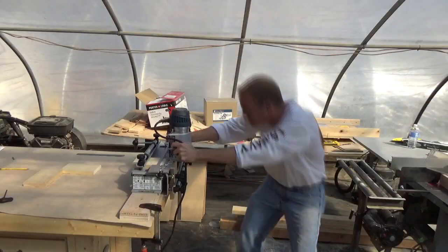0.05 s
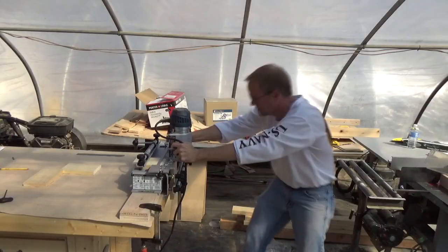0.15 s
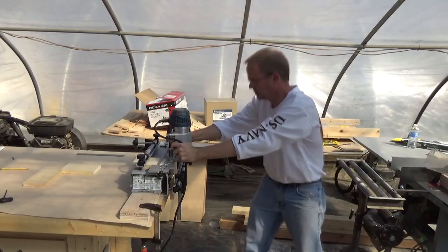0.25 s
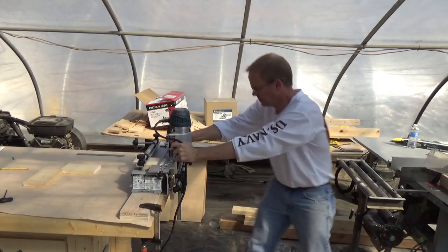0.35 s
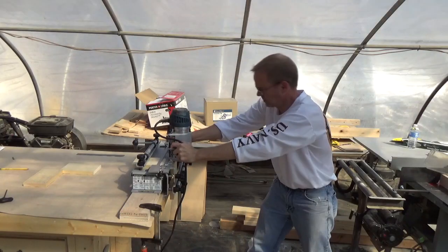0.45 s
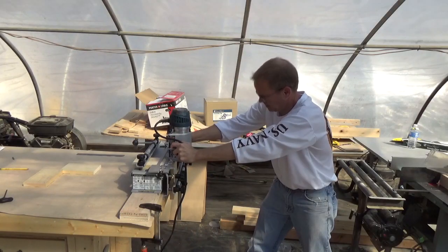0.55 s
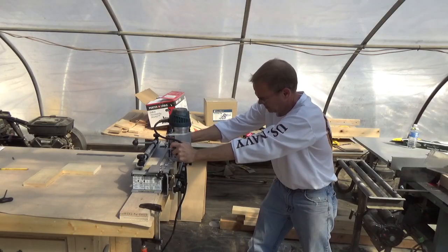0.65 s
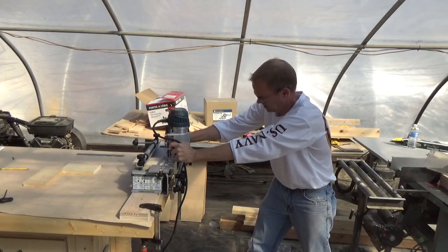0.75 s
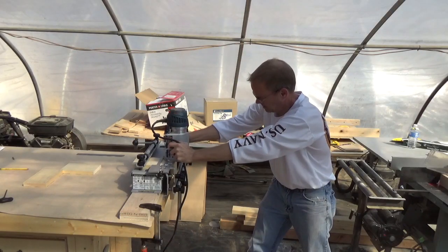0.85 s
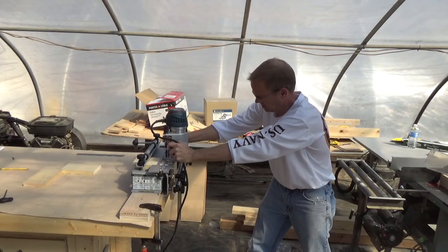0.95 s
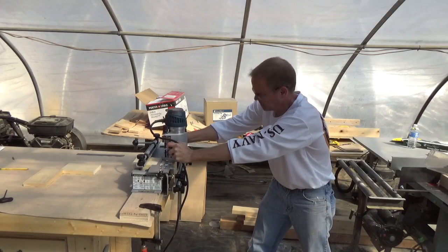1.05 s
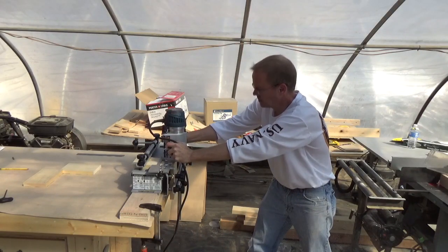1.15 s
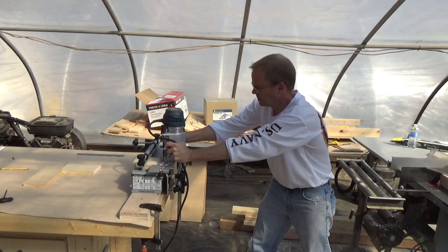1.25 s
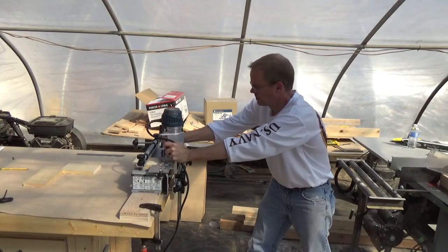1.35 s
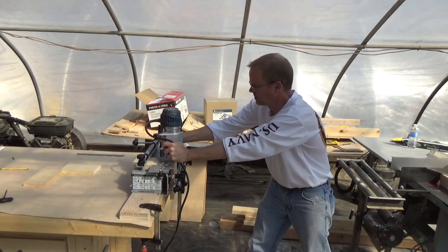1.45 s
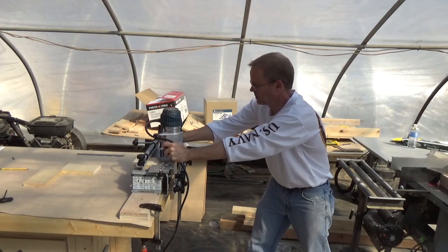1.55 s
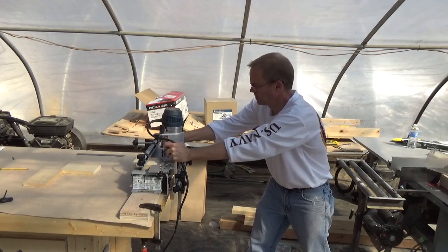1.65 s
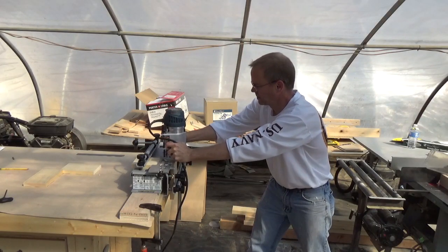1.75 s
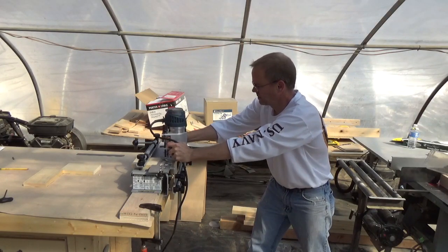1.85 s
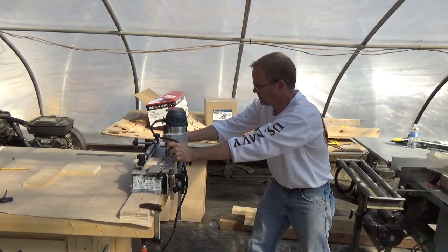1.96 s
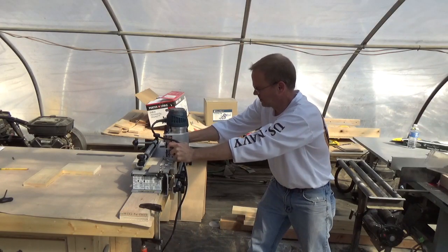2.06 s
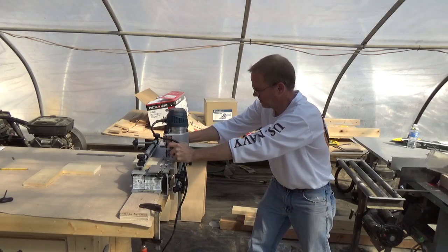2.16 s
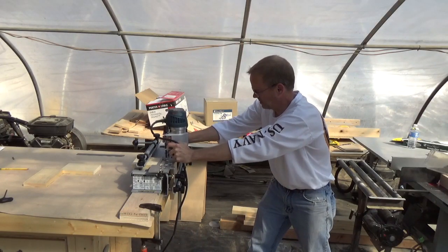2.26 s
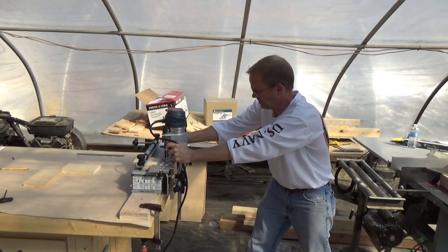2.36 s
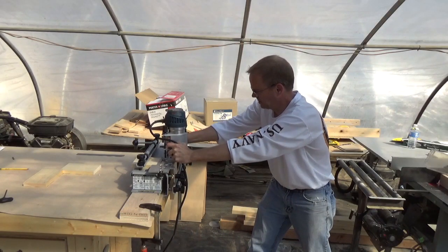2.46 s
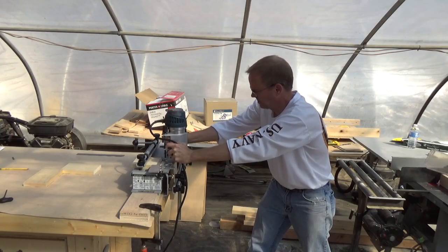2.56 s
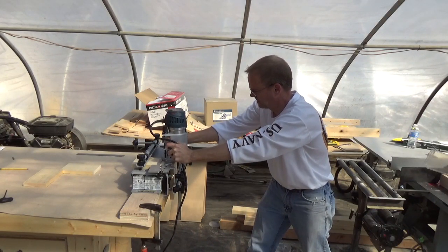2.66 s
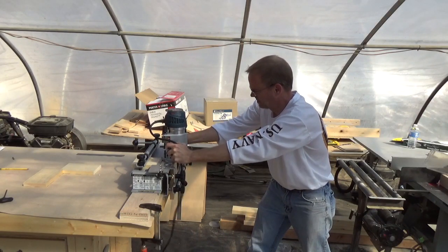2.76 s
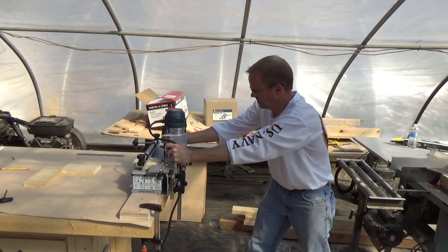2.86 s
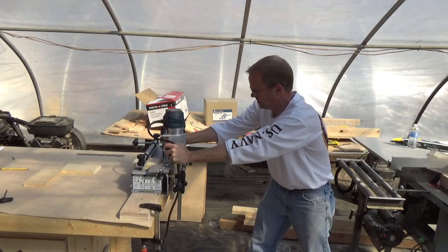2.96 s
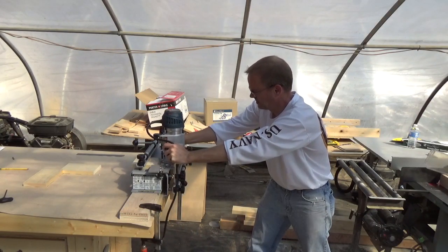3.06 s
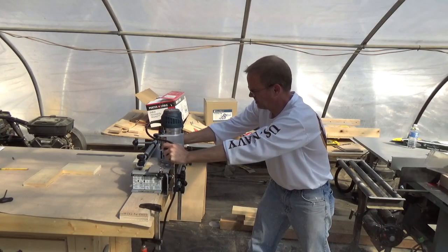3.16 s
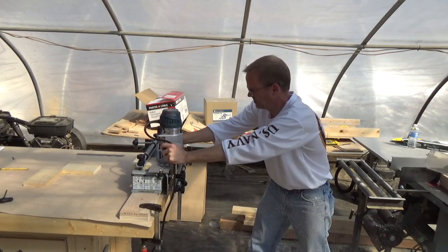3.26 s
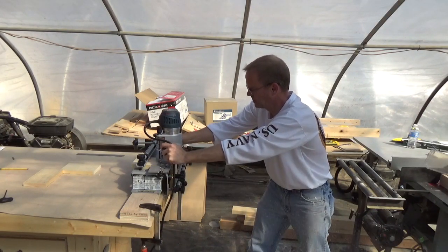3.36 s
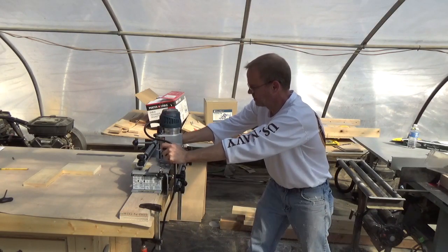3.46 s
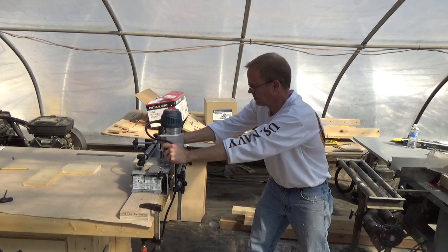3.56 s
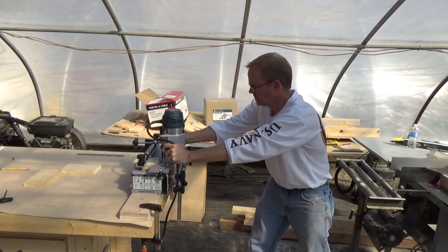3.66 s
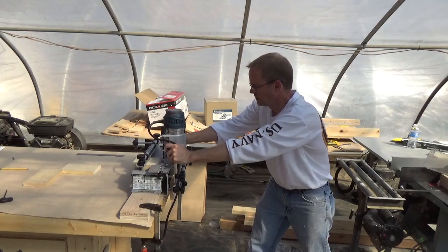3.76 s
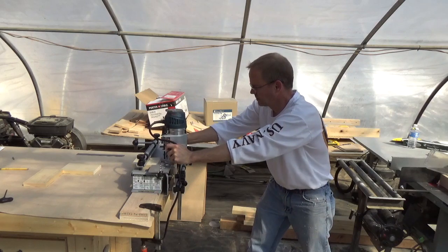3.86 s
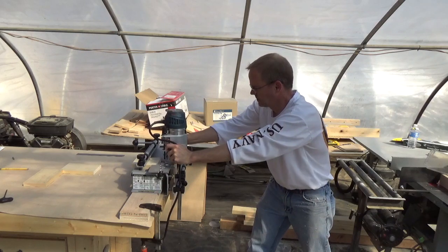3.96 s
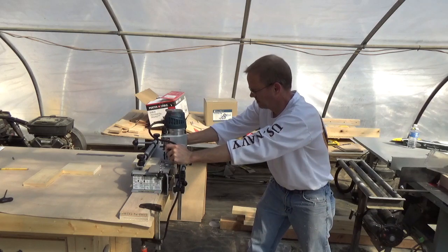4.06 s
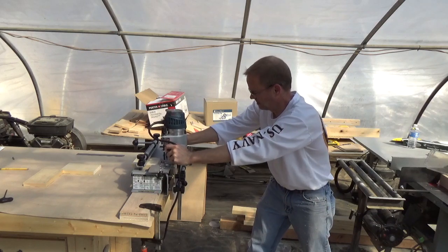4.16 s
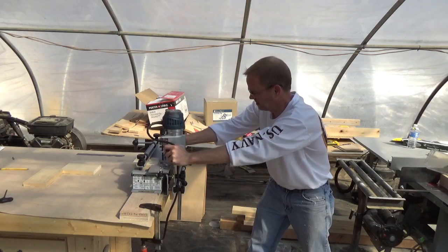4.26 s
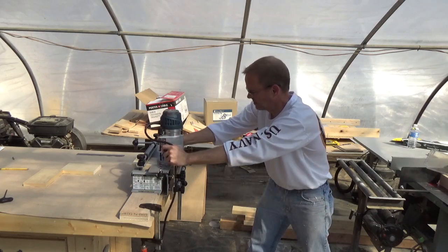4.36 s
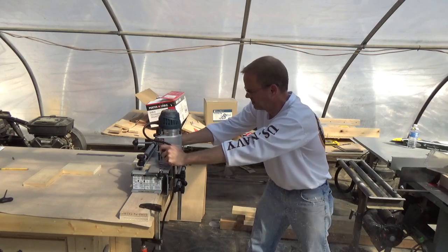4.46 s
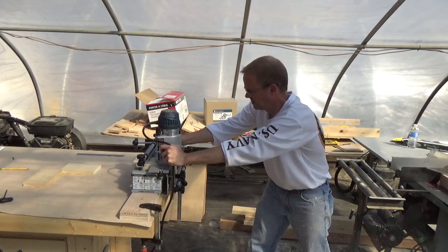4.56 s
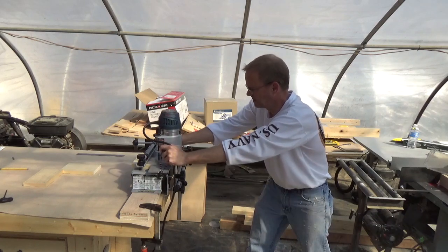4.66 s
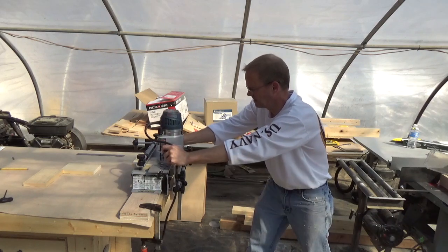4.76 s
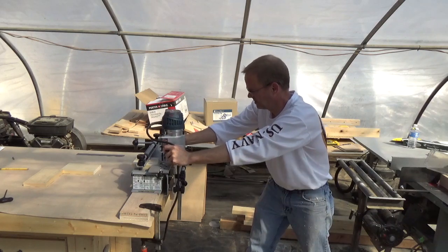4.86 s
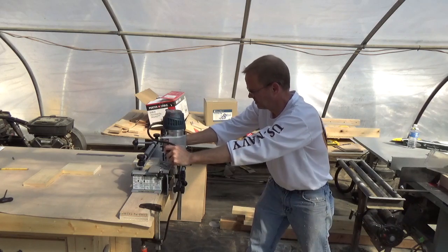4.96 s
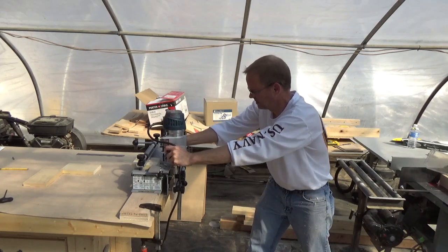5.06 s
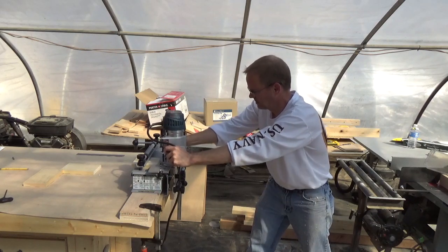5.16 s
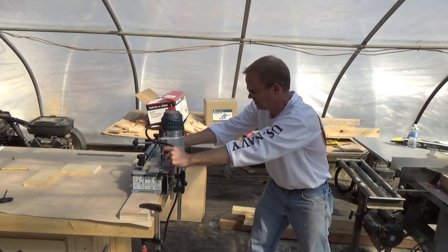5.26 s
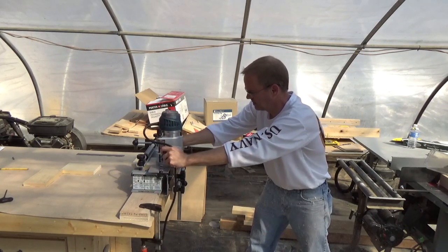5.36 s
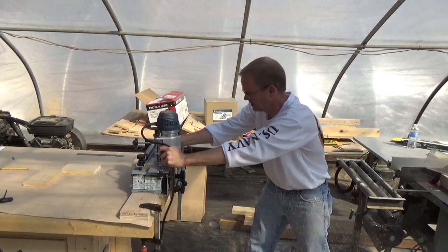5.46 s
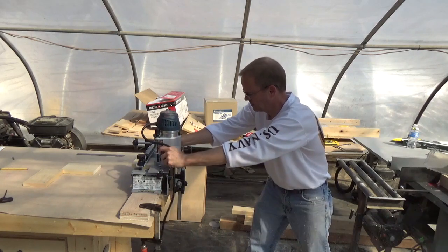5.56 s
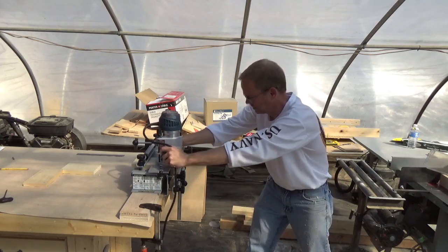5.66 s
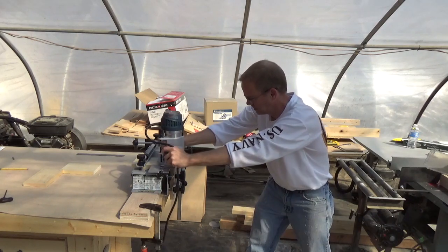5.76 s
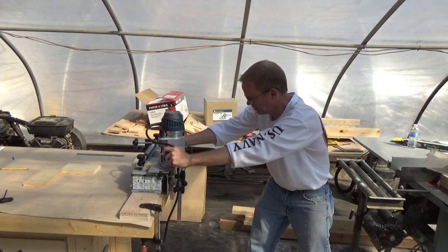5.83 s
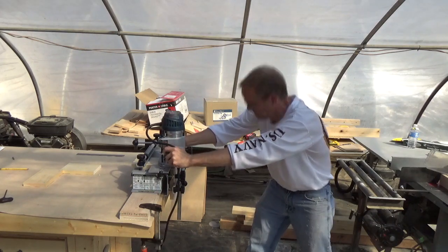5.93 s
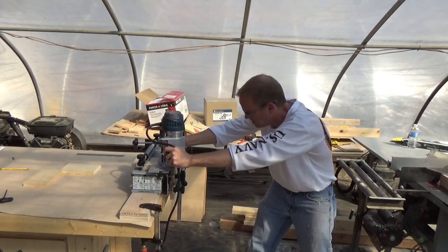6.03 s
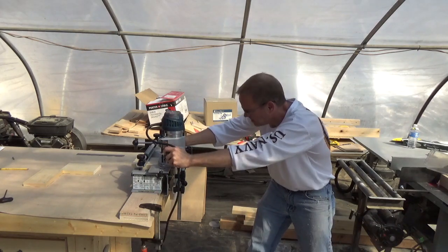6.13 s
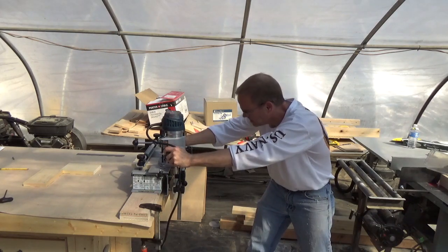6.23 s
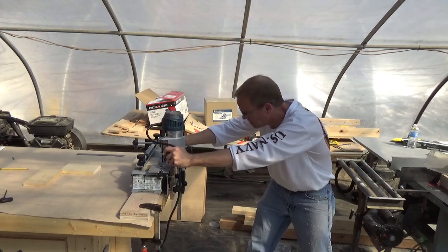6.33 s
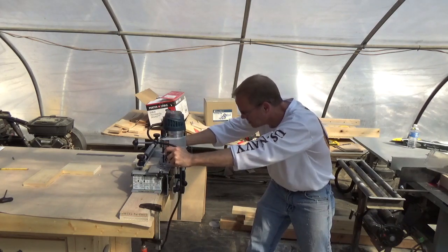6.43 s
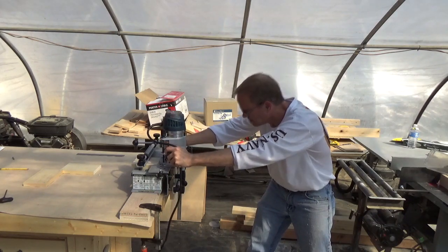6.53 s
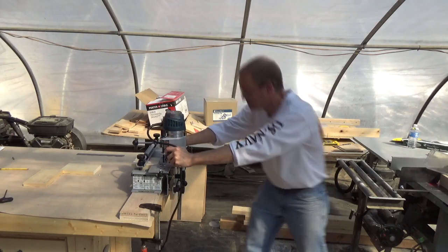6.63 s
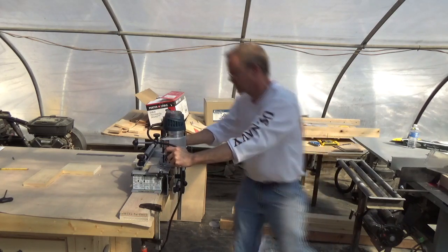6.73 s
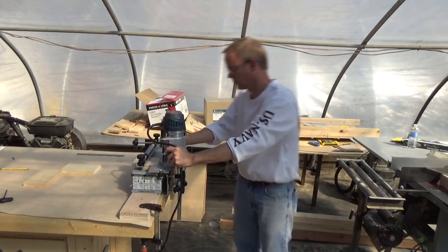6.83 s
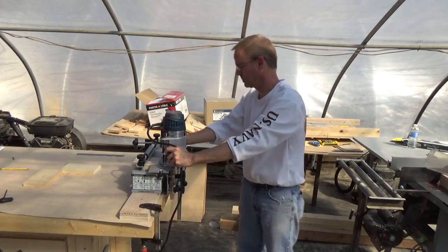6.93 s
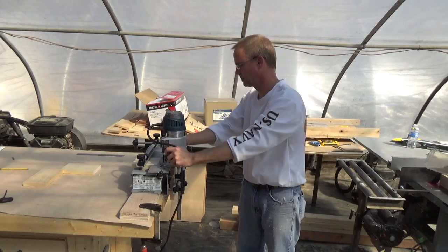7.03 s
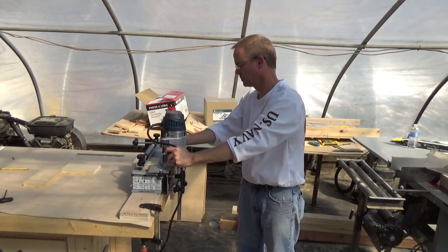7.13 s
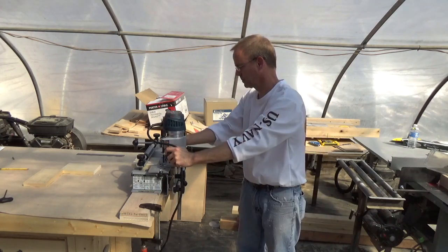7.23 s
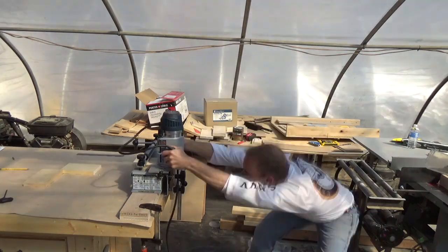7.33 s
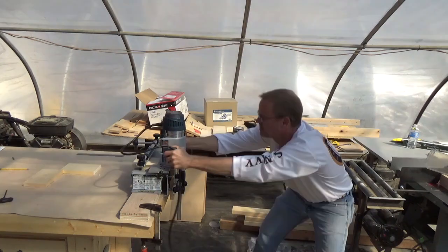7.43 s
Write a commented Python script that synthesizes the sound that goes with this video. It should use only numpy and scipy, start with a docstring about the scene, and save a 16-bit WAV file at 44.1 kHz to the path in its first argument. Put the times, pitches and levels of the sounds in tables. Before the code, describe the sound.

Close stereo microphone in a workshop with plastic film walls. For the first 0.3 seconds there is only low background rumble and faint rustling. At about 0.34 a handheld router is switched on: its pitch shoots up with a short rough squeal near 0.45 and fan air swelling, reaching full speed by about 0.9. A steady hum near 425 hertz carries a bright, flickering stack of whining overtones, prominent around 2 kilohertz, over roaring, hissing cooling air. Light cuts into boards sag the pitch slightly at about 1.3, 3.4, 4.55 and 5.5, the last three deeper; the whine turns harder and the air thins, then speed recovers quickly. At 6.2 the switch opens: the whine stops at once, thin whistles linger briefly, and a hollow, breathy whir slides down with an uneven hum. At 7.4 sound breaks off for a few milliseconds, then airy noise swells back until the end.

```python
"""Handheld router, four light cuts

Close stereo microphone in a film-walled workshop: the router is switched on, cuts clamped boards and coasts down.
The shaft's rotation sounds as a stack of sine multiples that sag with the load. The cooling air, shaped noise,
roars and hisses through the housing. At the end the sound breaks off, and the air fades in again."""
import sys
import numpy as np
from scipy import signal
from scipy.fft import rfft, irfft, next_fast_len
from scipy.io import wavfile
from scipy.ndimage import uniform_filter1d

SR = 44100
rng = np.random.default_rng(int(sys.argv[2]) if len(sys.argv) > 2 else 0)


def int16_out(signal):
    """Quantize to a 16-bit WAV file."""
    q = np.round(np.clip(np.atleast_2d(signal).T, -1, 1) * 32767)
    wavfile.write(sys.argv[1], SR, q.astype(np.int16))


def attenuation_scalar(level_db):
    """Turn a level in dB into a linear amplitude multiplier (20 dB per decade)."""
    decades = np.asarray(level_db, float) / 20
    return 10 ** decades


N = 330309   # length in samples

ON_S, OFF_S, AT_SPEED_S = .34, 6.2, .7
BREAK_S = 7.399, 7.406   # start and end of the near-silent gap

# shaft speed through run-up, four cuts, coasting and the fade back in: [t/s, turns per second/Hz]
SPEED = [(.29, 45), (.34, 78), (.42, 123.6), (.46, 190), (.52, 290.7), (.58, 358.4), (.66, 392), (.77, 413),
         (.92, 425.4), (1.0, 425.5), (1.32, 412), (1.44, 422), (1.54, 430), (1.66, 424.5), (1.8, 426.5),
         (2.4, 424.5), (2.48, 428.4), (2.56, 425.1), (2.89, 425.4), (3.12, 414.7), (3.26, 403),
         (3.3, 396.9), (3.39, 394.4), (3.45, 405.2), (3.59, 420.3), (3.75, 427.4), (3.83, 423.3),
         (3.94, 426), (4.22, 425), (4.4, 412.3), (4.47, 403.7), (4.51, 394.7), (4.55, 390.5), (4.62, 403.5),
         (4.76, 420), (4.88, 427.5), (4.97, 422.5), (5.12, 425.7), (5.26, 420.8), (5.4, 412), (5.48, 403),
         (5.53, 388.4), (5.6, 404.2), (5.73, 419), (5.83, 426), (6.15, 424.8), (6.18, 421), (6.2, 410),
         (6.3, 361), (6.48, 305), (6.72, 243.3), (6.954, 188.6), (7.2, 140), (7.4, 103), (7.41, 139),
         (7.49, 140.6)]
GOVERNED_HZ, RECOVER_S = 426, 0.079   # the speed the motor pulls back to, and how quickly
LIGHT_DRAG_HZ, FULL_DRAG_HZ = 9.7, 39.4   # speed withheld by the bit at no and at full load
LET_GO_S = .022   # the bit's grip on the sound lags by this much

# the multiples of the rotation that stand out, by number
LEADING = [2, 3, 4, 5, 6, 7, 8, 9, 10, 13, 18]
# their levels: [free level/dB, loaded level/dB, flicker/dB]
LEADING_DB = [(-51.5, -46, 2), (-54, -36.5, 2.5), (-50.5, -43.5, 3), (-37.5, -33, 1.27),
              (-52.5, -36.5, 2.5), (-53, -47, 3.5), (-53.5, -52, 3.5), (-51, -47.5, 3.5), (-52.5, -49, 4),
              (-52, -60, 2.5), (-48, -62, 3)]
# momentary swells, one list for each leading multiple: [t/s, length/s, level/dB]
SWELLS = [
    [(1.8, 0.24, -58), (2.1, 0.44, -44), (2.46, 0.097, -47), (2.63, 0.11, -45.5), (3.74, .1, -45),
     (3.95, 0.58, -44), (4.87, 0.18, -39.5), (5.15, 0.19, -47), (5.9, .12, -45.5), (6.11, .12, -44)],
    [(2.2, .4, -45.5), (2.56, .1, -45), (3.01, 0.099, -43), (3.73, 0.093, -41.5), (3.91, .15, -44),
     (3.28, 0.059, -38), (4.32, 0.16, -40.5), (4.9, 0.083, -44.5), (5.24, 0.18, -34.5), (5.68, 0.085, -45)],
    [(.69, 0.049, -34), (.92, 0.11, -45), (1.2, 0.11, -49), (1.75, .7, -43.5), (2.5, 0.28, -46),
     (3.12, 0.077, -42.5), (3.82, 0.11, -39), (5.66, 0.076, -58), (5.9, .12, -47)],
    [(1.06, 0.19, -36.5), (2.4, 0.44, -37), (2.75, 0.38, -35), (3.85, 0.43, -37), (4.3, .2, -41),
     (5.42, 0.097, -42), (3.2, 0.1, -40), (3.34, 0.072, -25)],
    [(.75, 0.38, -48), (1.23, .12, -51), (1.7, 0.26, -45.5), (2.45, 0.083, -44), (3.2, 0.09, -39),
     (3.72, 0.25, -45), (5.25, .08, -48)],
    [(.85, 0.68, -49), (1.75, .2, -57), (2.32, 0.055, -42), (2.5, 0.069, -47), (2.86, 0.042, -39),
     (3.04, .07, -43), (3.17, 0.082, -43), (4.02, 0.14, -42.5), (4.42, 0.077, -47), (4.6, 0.11, -46),
     (4.72, .07, -43), (5.08, 0.074, -47), (5.58, .12, -47), (5.8, .1, -52), (5.98, 0.26, -43.5)],
    [(2.32, 0.059, -49), (2.65, 0.22, -55), (3.18, .12, -41), (3.33, .1, -41.5), (3.6, 0.13, -50),
     (4.15, .3, -46), (4.96, 0.084, -42), (5.08, 0.065, -41), (5.92, 0.13, -44.5), (6.1, 0.094, -45.5)],
    [(.92, 0.41, -47.5), (1.78, 0.063, -45), (1.9, 0.063, -53), (2.25, 0.29, -47.5), (2.63, 0.17, -50),
     (3.16, .08, -49), (3.35, 0.083, -43), (3.46, .07, -47), (4.24, 0.11, -48), (4.75, 0.12, -48.5),
     (5.26, 0.15, -42.5), (5.7, 0.097, -40)],
    [(.93, 0.046, -39.5), (1.03, 0.093, -40), (2.36, 0.14, -43), (2.82, .12, -47), (3.17, .1, -46),
     (3.34, 0.079, -53), (3.49, .12, -43.5), (3.65, 0.091, -43), (4.0, .07, -51), (4.18, 0.059, -41),
     (5.08, .07, -51), (5.2, 0.061, -48), (5.87, .1, -48), (6.0, .15, -45)],
    [(.95, 0.073, -44), (1.25, .08, -45.5), (1.78, 0.33, -45), (2.43, 0.087, -46), (2.56, 0.11, -39),
     (2.78, .12, -42.5), (3.62, .15, -47), (4.73, 0.099, -44), (4.97, 0.092, -44), (5.24, 0.21, -50),
     (5.74, 0.083, -46)],
    [(.95, 0.093, -45), (1.23, 0.11, -41), (1.62, .45, -42), (2.11, .2, -44.5), (2.47, .07, -50),
     (2.63, 0.085, -44), (3.08, 0.2, -39.5), (3.64, .15, -44), (4.32, .15, -48), (4.73, 0.086, -39.5),
     (4.97, .1, -41), (5.72, .12, -41), (5.98, 0.16, -45)],
]
# brief fades of the fifth multiple: [t/s, length/s, level change/dB]
FADES = [(1.303, 0.21, -13), (1.82, .04, -4), (2.55, 0.083, -5), (2.96, 0.088, -4), (3.501, 0.065, -4.5),
         (4.66, 0.071, -5), (5.186, .1, -6.5), (5.62, .06, -10)]
# other multiples, running free: [multiple, relative level/dB]
FREE = [(11, -12), (12, -14), (14, -12), (15, -13.5), (16, -15), (17, -18.5), (19, -15), (20, -18),
        (21, -17), (22, -17.5), (23, -21.5), (24, -19), (25, -28)]
# the same with the bit in the wood: [multiple, relative level/dB]
LOADED = [(11, -10.5), (12, -11), (14, -14), (15, -13), (16, -15), (17, -13), (19, -14.5), (20, -12),
          (21, -21), (22, -17.5), (23, -18), (24, -22), (25, -20)]
# the bit skims the wood: [t/s, length/s]
SKIMS = [(1.17, .35), (3.05, 0.32), (3.6, 0.22), (4.25, .3), (5.25, 0.27), (5.9, 0.29)]
SKIM_HISS_DB, CHATTER_DB = 0.8, 2.5   # rise of the hiss and of the other multiples there
OTHERS_DB, RECOVERING_DB = -40.5, -3   # all other multiples; the fifth while the shaft regains speed
NOTCH_HZ, NOTCH_WIDTH_HZ, NOTCH_DB = 1998.5, 15.4, -21   # a pitch at which the loaded whine cancels
WHINE_IN_S, WHINE_IN_DB = (.34, .58, .74), (-45, -17, 0)   # the whine emerges near full speed
WHINE_OUT_S = 0.029   # the whine dies as the switch opens

# answer of bench and workshop to a low tone: [f/Hz, level/dB]
ANSWER = [(78, -74), (103, -68), (114, -56), (128, -70), (140, -51), (170, -65), (189, -44), (217, -59),
          (229, -48.5), (243, -60), (256, -47), (275, -47), (293, -43), (308, -49), (325, -59),
          (348, -40.5), (368, -43), (392, -39), (410, -42), (426, -38.4)]
HUM_LOAD_DB = -4   # change of the hum under full load
# brief dips and swells of the lower sound: [t/s, length/s, hum change/dB, roar change/dB]
DIPS = [(0.572, 0.019, -11, 0), (0.897, 0.16, 2.5, 1.5), (1.27, 0.14, -2, -6), (1.342, 0.047, -2.5, -20),
        (1.445, 0.11, 2, -1), (1.555, .1, -2.5, 1), (1.818, 0.022, -14, -4), (2.47, .1, -2.5, 1),
        (2.95, .5, -0.5, -1.5), (3.41, 0.035, -5, 5), (3.521, .06, -5.5, 0), (4.09, 0.078, -3, 4),
        (4.585, 0.029, -20, 4), (4.688, .06, -7, -1), (5.571, 0.047, -24, 2), (5.659, 0.063, -7, 1),
        (5.735, 0.1, 4, 0), (6.098, .25, 2, 2)]

# second multiple while coasting, by its pitch: [f/Hz, level/dB]
SECOND = [(206, -69), (256, -67), (280, -57), (310, -68), (353, -59), (378, -49), (412, -64), (434, -45),
          (459, -50), (489, -44), (515, -51), (549, -50), (612, -59), (648, -45), (690, -55), (730, -49),
          (820, -59)]
# thin whistles that outlast the switch-off: [f/Hz, level/dB]
LINGERING = [(7700, -50), (4250, -54.5)]
LINGER_END_S = 6.52
# squeal while the motor gathers speed: [t/s, f/Hz, level/dB]
SQUEAL = [(.42, 2135, -48), (.44, 2147, -34), (.46, 2500, -37), (.477, 2570, -40), (.485, 2980, -43),
          (.502, 3070, -46)]

# what the fan speed sets, columns 1-5 before other changes:
# [turns per second/Hz, roar level/dB, hiss level/dB, housing level/dB, shell level/dB, brush band level/dB]
BY_SPEED = [(45, -69, -81, -95, -74, -60), (103, -49, -58, -58.5, -46.5, -57),
            (133.5, -44.5, -46.5, -47.5, -49.5, -51.5), (159, -42, -44.5, -44.5, -49, -51.5),
            (189, -38.5, -40.5, -39, -52, -47.5), (230, -36, -40, -41, -49, -51),
            (282, -35, -39.5, -40, -60, -71), (359, -35.5, -38, -40, -51, -66),
            (425, -40.5, -39.5, -46, -61, -62)]
# colour of the air noise: [f/Hz, relative level per Hz/dB]
COLOUR = [(100, -38.5), (250, -22.5), (450, -20), (650, -12), (950, -6), (1060, -8.5), (1250, -4.5),
          (2100, -8), (2900, -13), (4500, -10), (7500, -13), (11000, -17.5)]
SPLIT_HZ = 3400   # roar below, hiss above
AIR_LOAD_DB, HISS_LOAD_DB = -6.5, -4   # change of roar and hiss under full load
AIR_SURGE_DB = 0.5   # the air surges as the shaft regains speed
AIR_LAG_S, AIR_LAG_DB = (0.33, 0.49), -7.5   # the airflow builds a little after the shaft starts
# housing resonances blown by the air: [f/Hz, width/Hz, relative level/dB]
HOUSING = [(650, 75, -6), (740, 32, 1.5), (900, 57, 0), (956, 34, -1.5), (1211, 55, 0), (1529, 60, -3.5),
           (1853, 69, -1), (2082, 29, 0.5)]
# higher resonances heard while the shaft turns slowly: [f/Hz, width/Hz, relative level/dB]
SHELL = [(2250, 310, 0), (3250, 200, -4.5), (4520, 210, -5.5), (7300, 160, -15)]
RING_LAG_S, RING_LAG_DB = (0.37, 0.48), -11   # the housing takes up the airflow later still
# return of the air after the break: [t/s, gain/dB]
FADE_IN = [(7.406, -59), (7.44, -34), (7.465, -1), (7.49, 5)]

# faint rustling before the start: [t/s, length/s, relative level/dB]
RUSTLE = [(0.095, 0.073, -62), (0.17, .04, -72), (0.26, 0.07, -65.5)]
# colour of the rustling: [f/Hz, relative level per Hz/dB]
RUSTLE_COLOUR = [(200, -9), (1500, 2), (2300, -1.0), (3000, -3.5), (5000, -8.0), (7500, -5), (11000, -9.5)]
RUSTLE_FLOOR_DB = -81   # relative level between the swells
# colour of the low background: [f/Hz, relative level per Hz/dB]
RUMBLE_COLOUR = [(25, -6), (50, -10), (80, 4.5), (130, 0), (250, -12), (500, -12)]
RUMBLE_SLOW_DB, RUMBLE_FAST_DB, RUMBLE_TURN_HZ = -66, -78.5, (300, 425)

# left-right likeness of the noises: [f/Hz, correlation]
LIKENESS = [(60, 1), (170, 0.95), (480, 0.95), (1370, 0.85), (3880, 0.88), (11000, 0.97)]
# phase by which the left port leads: [f/Hz, phase/rad]
LEAD = [(0, 0.039), (260, -0.32), (1120, -0.44), (1380, -0.094), (2150, -0.47), (3880, -0.054),
        (6720, 0.074), (7670, -0.59), (11200, 0.7)]
# left minus right port: [f/Hz, level difference/dB]
LEAN = [(60, 1), (110, -0.5), (190, 1), (340, 2), (610, 0.5), (1080, 1.5), (1940, 1.0), (3450, 0),
        (6160, 1.0), (11000, 0.0)]
TOP_HZ = 11040   # the treble ends here: nothing passes from here up


def in_time(rows):
    """Columns of a table, one value a sample."""
    s, *columns = np.transpose(rows)
    return [np.interp(np.arange(N) / SR, s, c) for c in columns]


def at_hz(points, hz):
    """A spectrum read on a log-frequency axis."""
    x, y = np.transpose(points)
    return np.interp(np.log(hz + 1), np.log(x + 1), y)


def by_speed(speed, axis):
    """One column of the fan-speed table, in dB at each sample."""
    return at_hz([(row[0], row[axis]) for row in BY_SPEED], speed)


def rms_one(x):
    """Scaled to rms 1."""
    return x / np.sqrt(np.mean(x ** 2) + 1e-20)


def between(t0, t1):
    """1 from t0 to t1, with 10 ms slopes outside."""
    return np.interp(np.arange(N) / SR, [t0 - .01, t0, t1, t1 + .01], [0, 1, 1, 0])


def bump(at, length):
    """A smooth hump of height 1, about that long."""
    return np.exp(-.5 * ((np.arange(N) / SR - at) / (length / 3)) ** 2)


def bump_sum(rows):
    """Humps for rows of time and length."""
    return sum(bump(s, length) for s, length in rows)


def drift(rate):
    """Slow random wander of spread 1: noise through two low-pass poles at rate (Hz), one value per 64 samples."""
    pole = np.exp(-128 * np.pi * rate / SR)
    chance = rng.standard_normal(N // 64 + 2002)
    slow = signal.lfilter([1], [1, -2 * pole, pole * pole], chance)[2000:]   # settled part only
    return np.interp(np.arange(N) / 64, np.arange(len(slow)), rms_one(slow - slow.mean()))


def tone(turns, level_db, apart):
    """A sine whose walls' echoes shift the two channels slowly against each other."""
    sway = apart * drift(3.1) * [[1], [-1]]
    shift = apart * drift(2.0) * [[1], [-1]]
    sine = np.sin(2 * np.pi * (turns + rng.random()) + shift)
    return np.sqrt(2) * attenuation_scalar(level_db) * (1 + sway) * sine


def noise(gain_at):
    """Stereo noise of rms 1 with a given gain per frequency, its channels partly alike."""
    size = next_fast_len(N)
    hz = np.arange(size // 2 + 1) * SR / size
    mid, side = rfft(rng.standard_normal((2, size)))
    alike = np.clip(at_hz(LIKENESS, hz), 0, 1)
    pair = np.sqrt(1 + alike) * mid + np.sqrt(1 - alike) * side * [[1], [-1]]
    return rms_one(irfft(pair * gain_at(hz), size)[:, :N])


def blown(resonances, tilt_db):
    """Noise in each resonance, wavering on its own; tilt per octave about 1 kHz."""
    out = 0
    for at, width, db in resonances:
        band = noise(lambda hz: 1 / (1 + (2 * (hz - at) / width) ** 2))
        width_db = 10 * np.log10(width / 400)   # wider bands carry more power
        level_db = db + width_db + tilt_db * np.log2(at / 1000) + 2.8 * drift(2.8)
        out = out + attenuation_scalar(level_db) * band
    return out


def rotation():
    """Shaft speed, turns made, load (0-1) from the speed held back, and regaining (0-1); the governor hunts."""
    speed, = in_time(SPEED)
    gaining = np.gradient(uniform_filter1d(speed, size=1800)) * SR * RECOVER_S
    powered = between(AT_SPEED_S, OFF_S - .05)
    withheld = GOVERNED_HZ - speed - gaining
    load = powered * np.clip((withheld - LIGHT_DRAG_HZ) / (FULL_DRAG_HZ - LIGHT_DRAG_HZ), 0, 1)
    follow = 1 / (LET_GO_S * SR)
    load = signal.lfilter([follow], [1, follow - 1], load)
    regain = np.clip(gaining / 20, 0, 1)
    hunting = np.sin(2 * np.pi * (6.5 * np.arange(N) / SR + 0.288 * drift(1.573)))
    speed = speed + 0.569 * hunting
    return speed, np.cumsum(speed) / SR, load, regain


def whine(speed, turns, load, regain):
    """The higher multiples of the rotation, as sines; they change colour with load and come and go."""
    emerge_db = np.interp(np.arange(N) / SR, WHINE_IN_S, WHINE_IN_DB)
    echoes = rng.standard_normal(2000)   # wall echoes add or cancel, differently at each pitch
    skimming = bump_sum(SKIMS)
    fades_db = sum(db * bump(s, length) for s, length, db in FADES)
    out = 0
    for k, (free_db, loaded_db, flicker_db), swells in zip(LEADING, LEADING_DB, SWELLS):
        steady_db = free_db + load * (loaded_db - free_db) + (k == 5) * RECOVERING_DB * regain
        swell_power = sum(attenuation_scalar(db) ** 2 * bump(s, length) for s, length, db in swells)
        power = attenuation_scalar(steady_db) ** 2 + swell_power
        notch_db = NOTCH_DB * load * np.exp(-.5 * ((k * speed - NOTCH_HZ) / NOTCH_WIDTH_HZ) ** 2)
        level_db = 10 * np.log10(power) + emerge_db + notch_db
        level_db = level_db + (k == 5) * fades_db + flicker_db * drift(13.5)
        out = out + tone(k * turns + 0.0032 * k * drift(23), level_db, apart=0.13)
    for (k, free_db), (_, loaded_db) in zip(FREE, LOADED):
        ripple = np.interp(k * speed / 18.0, np.arange(2000), echoes)   # one echo value every 18 Hz
        level_db = OTHERS_DB + CHATTER_DB * skimming + emerge_db + free_db + load * (loaded_db - free_db)
        level_db = level_db + 3.2 * ripple + 5.7 * np.tanh(2.0 * drift(15.7))
        tremble = (0.0029 + .003 * load) * k * drift(23)   # blurs high multiples most
        out = out + tone(k * turns + tremble, level_db, apart=0.099)
    dying = np.interp(np.arange(N) / SR, [OFF_S - WHINE_OUT_S, OFF_S], [1, 0])
    return out * between(ON_S, OFF_S) * dying


def hum(speed, turns, load):
    """The once-a-turn tone, loud or faint as its pitch meets the bench's answer."""
    dips_db = sum(db * bump(s, length) for s, length, db, _ in DIPS)
    coasting_waver_db = 2.7 * drift(13) * between(OFF_S + .1, N / SR)
    level_db = at_hz(ANSWER, speed) + HUM_LOAD_DB * load + dips_db + 0.61 * drift(3.6) + coasting_waver_db
    return tone(turns, level_db, apart=0.072) * between(ON_S, BREAK_S[0])


def coasting(speed, turns):
    """The second multiple, broken up; a rough band from the 24 brush segments that sinks; brief thin whistles."""
    low_pass = signal.butter(2, 200, fs=SR, output="sos")
    rough = rms_one(signal.sosfilt(low_pass, rng.standard_normal(N)))
    band = np.sqrt(2) * attenuation_scalar(by_speed(speed, axis=5)) * rough * np.sin(2 * np.pi * 24 * turns)
    low = tone(2 * turns, at_hz(SECOND, 2 * speed) + 2.6 * drift(21.7), apart=0.09)
    thin = sum(tone(hz * np.arange(N) / SR, db + 3.5 * drift(18), apart=.1) for hz, db in LINGERING)
    return (low + band) * between(OFF_S, BREAK_S[0]) + thin * between(OFF_S, LINGER_END_S)


def squeal(turns):
    """A rising tone, roughened by fast random pitch changes, that throbs once a turn."""
    pitch, level_db = in_time(SQUEAL)
    throb = 1 + 0.38 * np.sin(2 * np.pi * (turns + 0.28))
    rough = np.cumsum(pitch + 90 * drift(130)) / SR
    return throb * tone(rough, level_db, apart=.1) * between(SQUEAL[0][0], SQUEAL[-1][0])


def air(speed, turns, load, regain):
    """Cooling air as noise split into roar below and hiss above, pulsed once a turn."""
    flow_db = AIR_SURGE_DB * regain + np.interp(np.arange(N) / SR, AIR_LAG_S, [AIR_LAG_DB, 0])
    dips_db = sum(db * bump(s, length) for s, length, _, db in DIPS)
    roar_db = by_speed(speed, axis=1) + flow_db + AIR_LOAD_DB * load + dips_db
    hiss_db = by_speed(speed, axis=2) + flow_db + HISS_LOAD_DB * load + SKIM_HISS_DB * bump_sum(SKIMS)
    roar = noise(lambda hz: attenuation_scalar(at_hz(COLOUR, hz)) / np.sqrt(1 + (hz / SPLIT_HZ) ** 6))
    hiss = noise(lambda hz: attenuation_scalar(at_hz(COLOUR, hz)) / np.sqrt(1 + (SPLIT_HZ / (hz + 1)) ** 6))
    gust = drift(18)   # shared by both
    roar = attenuation_scalar(roar_db - 3.0 + 0.5 * gust) * roar
    hiss = attenuation_scalar(hiss_db + 0.19 * gust + 1.04 * drift(22)) * hiss
    pulse = 1 + 0.17 * np.sin(2 * np.pi * turns)
    return pulse * (roar + hiss) * between(SPEED[0][0], N / SR)


def housing(speed):
    """Resonant noise bands: the slower the fan, the lower the resonances that its air reaches."""
    body = attenuation_scalar(by_speed(speed, axis=3)) * blown(HOUSING, 10.5 * np.log2(speed / 414))
    shell = attenuation_scalar(by_speed(speed, axis=4)) * blown(SHELL, 0)
    lag_db = np.interp(np.arange(N) / SR, RING_LAG_S, [RING_LAG_DB, 0])
    return (body + shell) * attenuation_scalar(lag_db) * between(SPEED[0][0], N / SR)


def rustle():
    """Broad noise in short, flickering swells until the switch-on."""
    level = attenuation_scalar(RUSTLE_FLOOR_DB) + sum(attenuation_scalar(db) * bump(s, length) for s, length, db in RUSTLE)
    swells = level * attenuation_scalar(4.0 + 3.3 * drift(39)) * between(0, ON_S)
    return swells * noise(lambda hz: attenuation_scalar(at_hz(RUSTLE_COLOUR, hz)))


def rumble(speed):
    """A low noise background that sinks while the motor runs fast."""
    level_db = np.interp(speed, RUMBLE_TURN_HZ, [RUMBLE_SLOW_DB, RUMBLE_FAST_DB]) + 1.5 * drift(1.4)
    return attenuation_scalar(level_db) * noise(lambda hz: attenuation_scalar(at_hz(RUMBLE_COLOUR, hz)) / (1 + (hz / 900) ** 4))


def scene():
    """All sources together, with the break near the end."""
    speed, turns, load, regain = rotation()
    s = np.arange(N) / SR
    fade_db, = in_time(FADE_IN)
    blowing = air(speed, turns, load, regain) + housing(speed)
    blowing = blowing * np.where(s > BREAK_S[0], attenuation_scalar(fade_db), 1)
    tones = whine(speed, turns, load, regain) + hum(speed, turns, load)
    tones = tones + coasting(speed, turns) + squeal(turns)
    gap = np.where((s > BREAK_S[0]) & (s < BREAK_S[1]), attenuation_scalar(-58), 1)
    return (tones + blowing + rustle() + rumble(speed)) * gap


def top_cut(x):
    """Nothing passes above the cut-off."""
    return signal.sosfilt(signal.butter(12, 11590, fs=SR, output="sos"), x)


def record(dry):
    """Two close microphone ports differ a little in phase and level; the top is cut."""
    size = next_fast_len(N)
    hz = np.arange(size // 2 + 1) * SR / size
    half = attenuation_scalar(at_hz(LEAN, hz) / 2) * np.exp(.5j * at_hz(LEAD, hz))   # half the difference to each port
    ports = irfft(rfft(dry, size) * [half, 1 / half] * (hz < TOP_HZ), size)[:, :N]
    return top_cut(ports)


dry = scene()
out = record(dry)
int16_out(out)
```